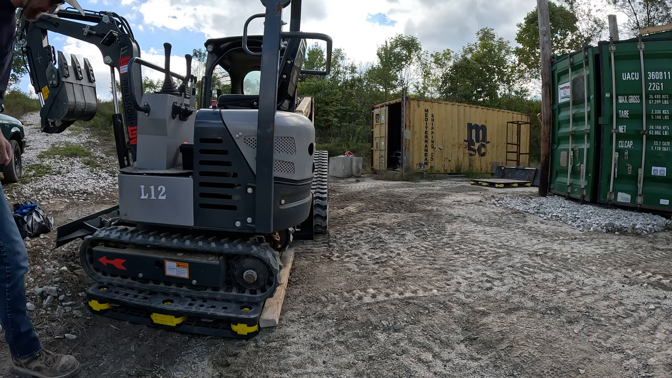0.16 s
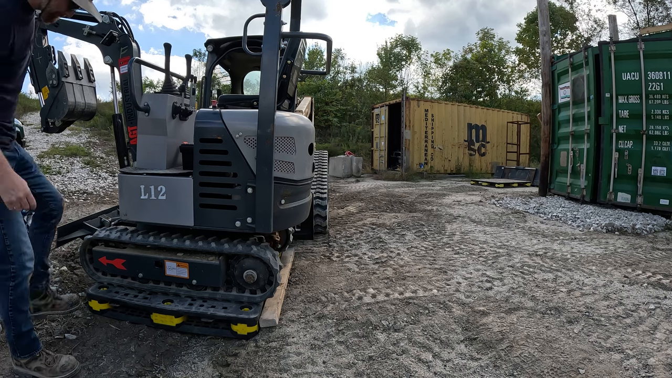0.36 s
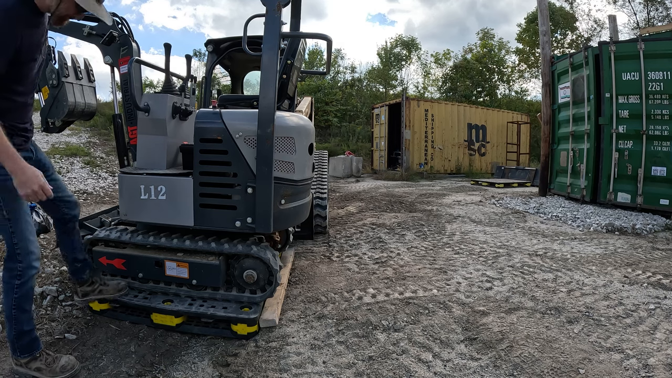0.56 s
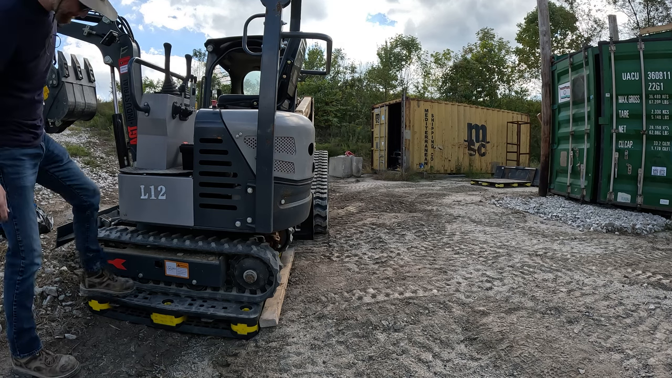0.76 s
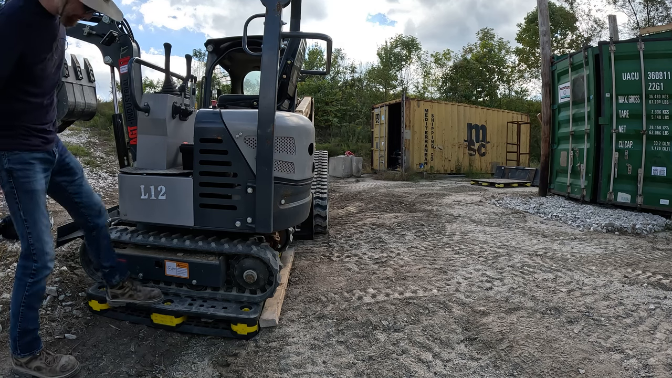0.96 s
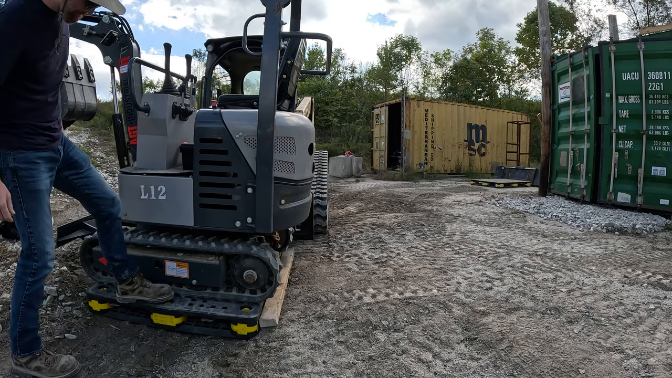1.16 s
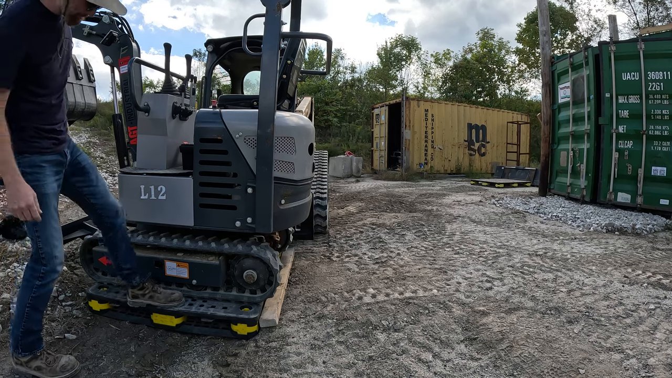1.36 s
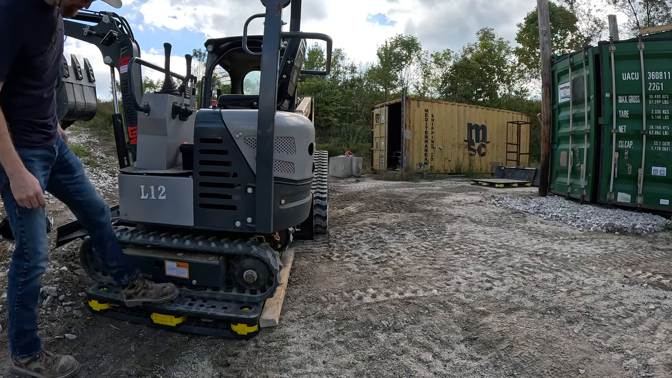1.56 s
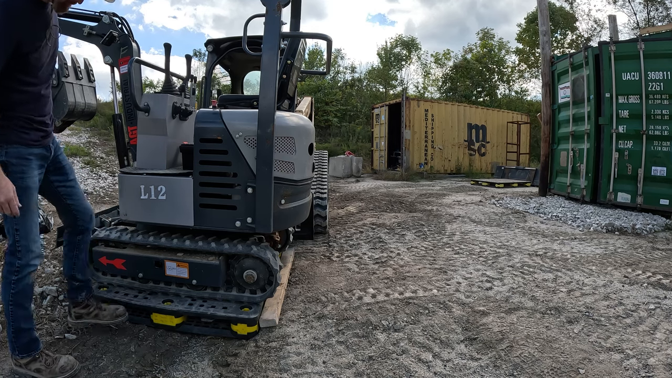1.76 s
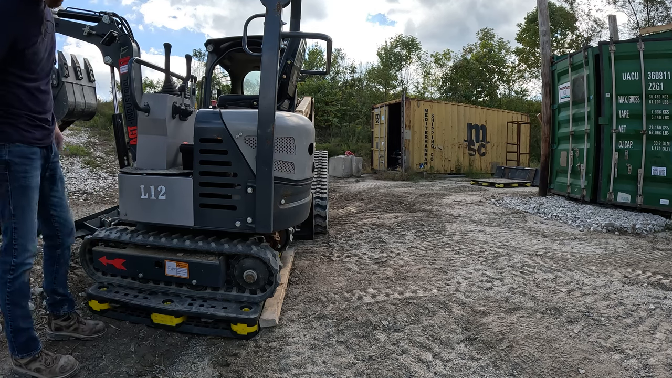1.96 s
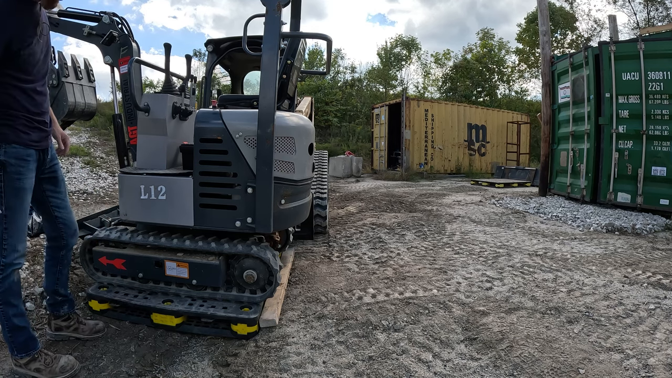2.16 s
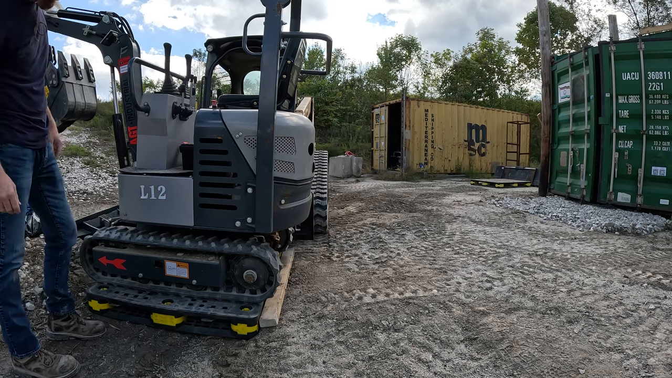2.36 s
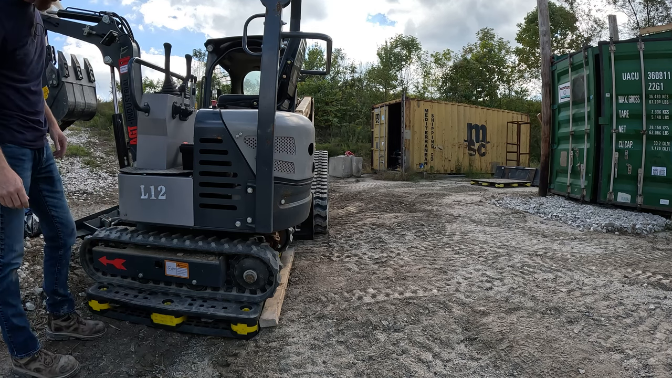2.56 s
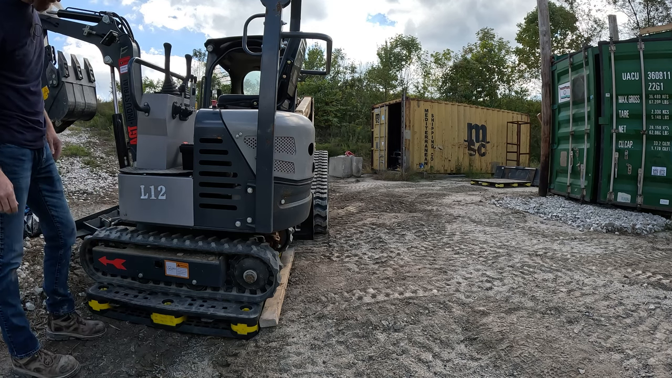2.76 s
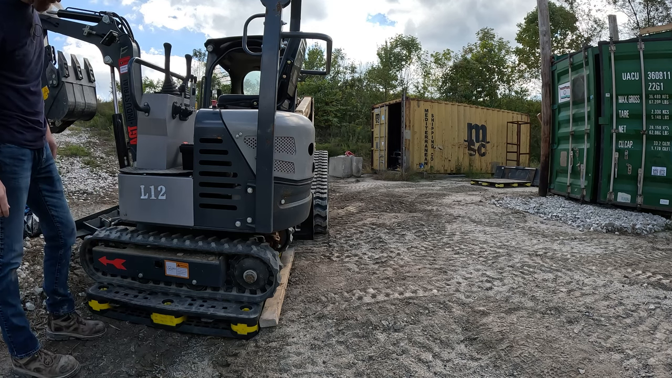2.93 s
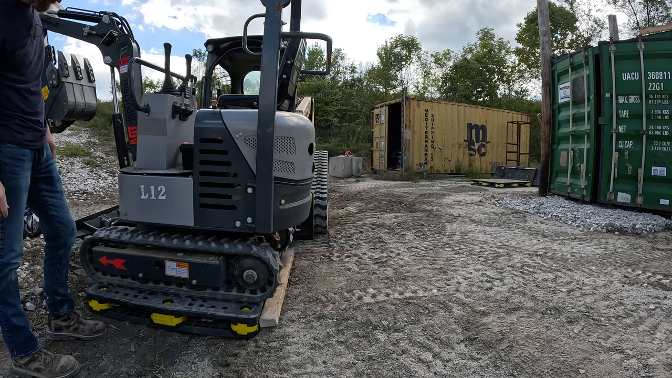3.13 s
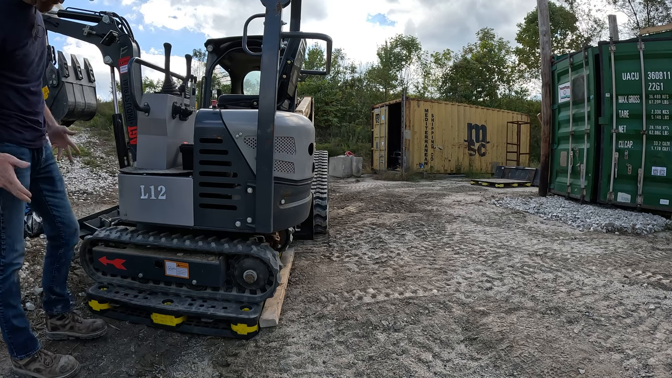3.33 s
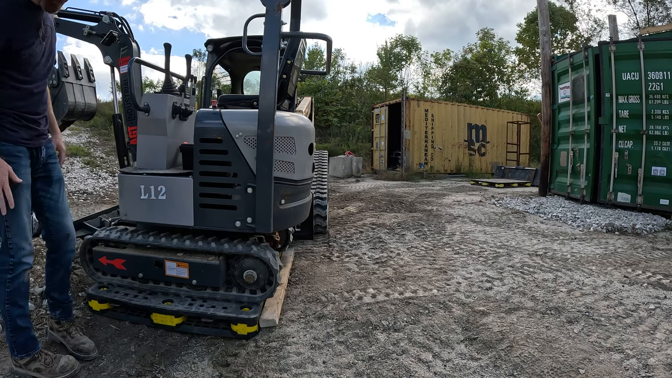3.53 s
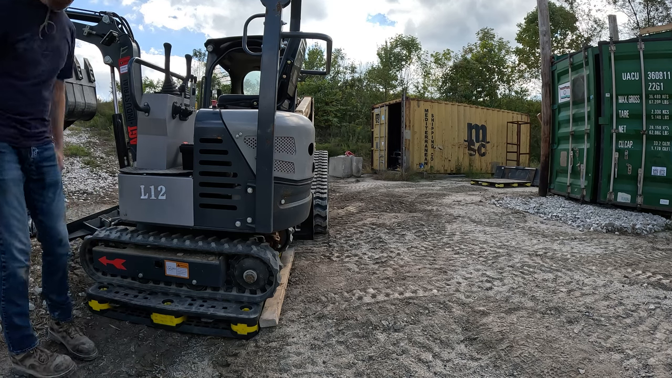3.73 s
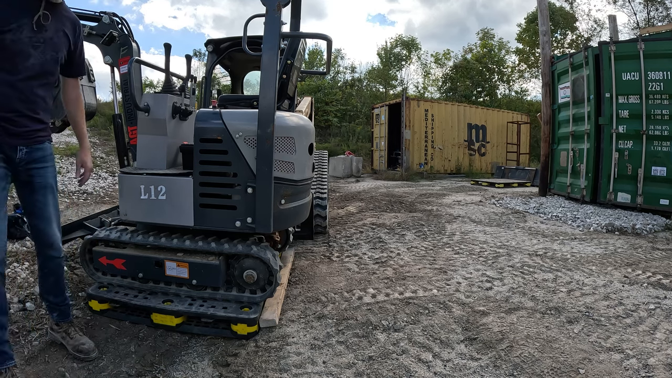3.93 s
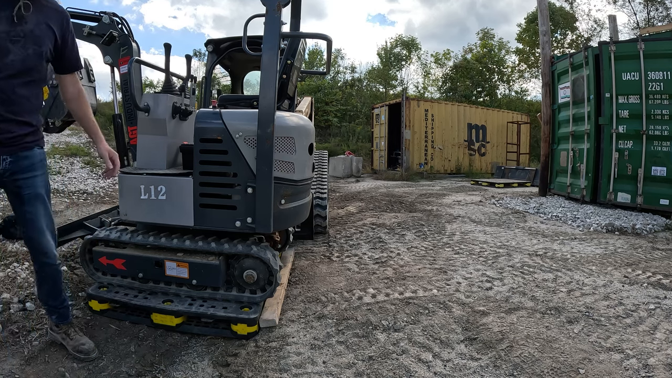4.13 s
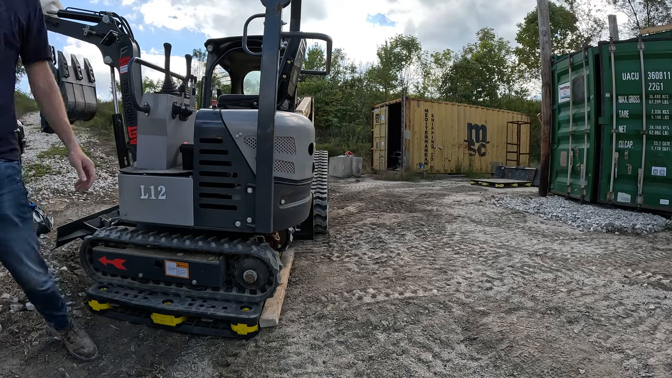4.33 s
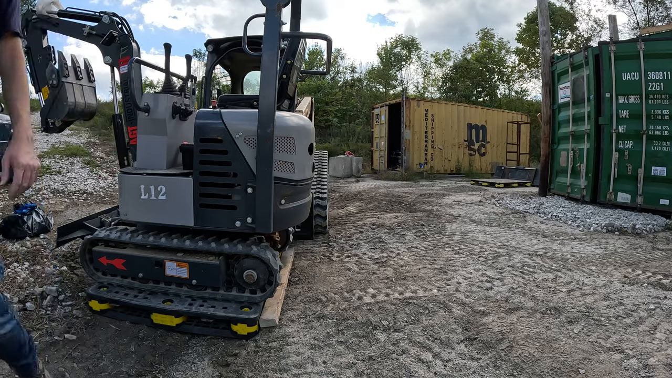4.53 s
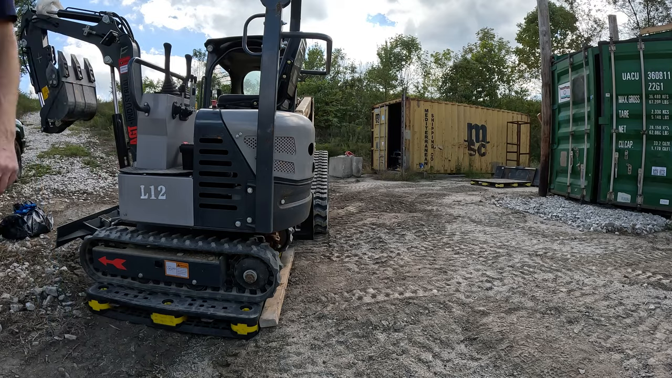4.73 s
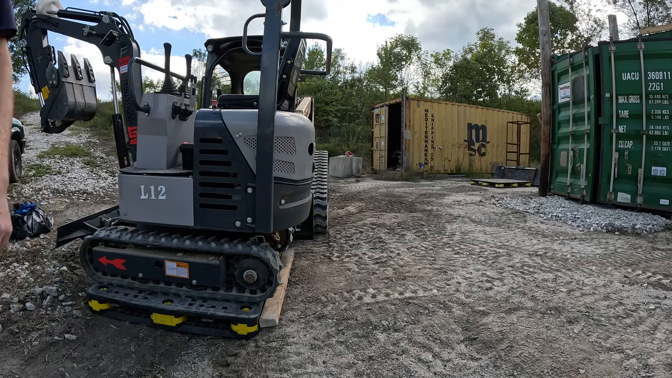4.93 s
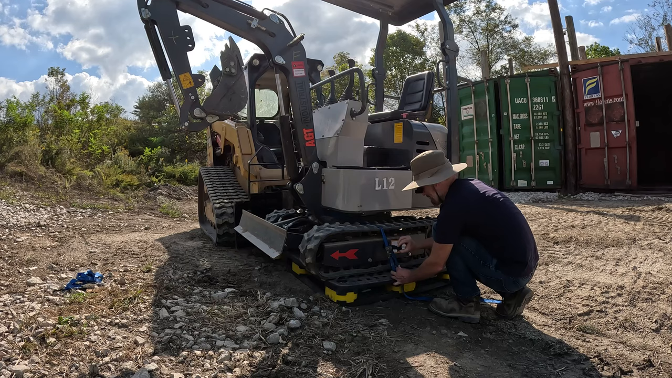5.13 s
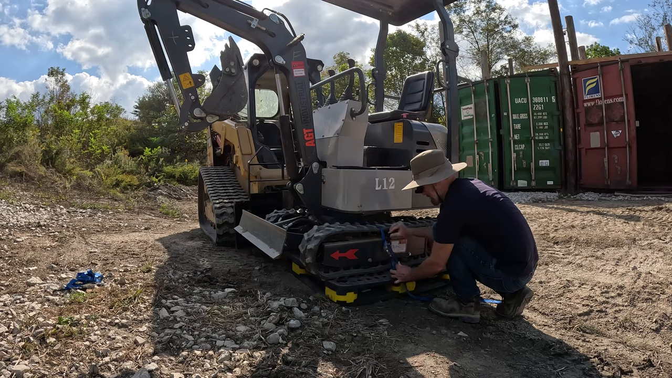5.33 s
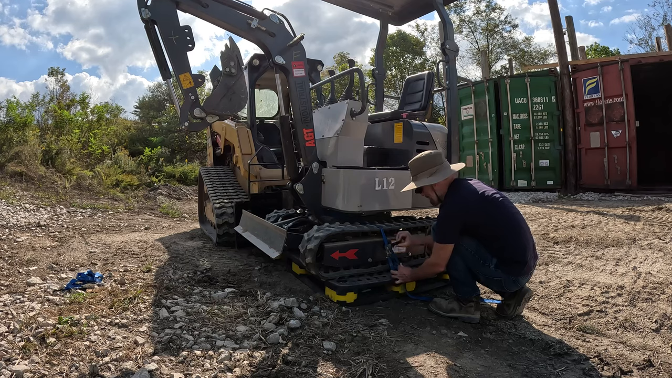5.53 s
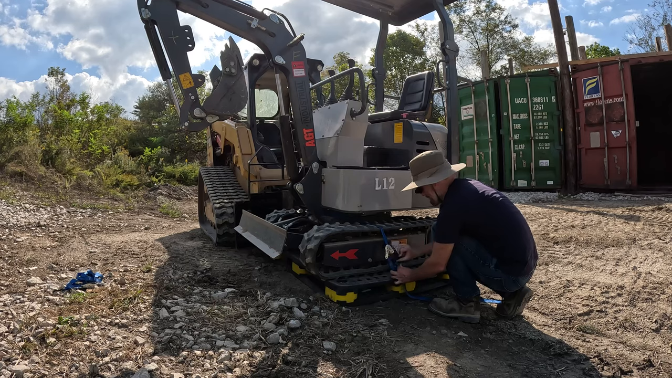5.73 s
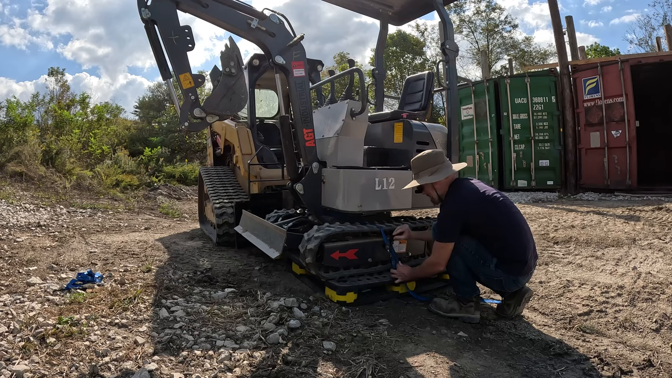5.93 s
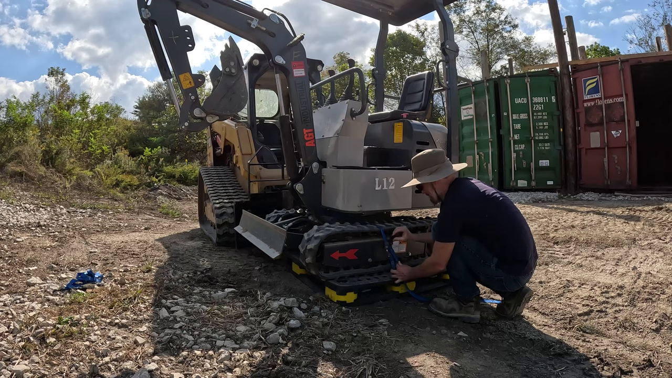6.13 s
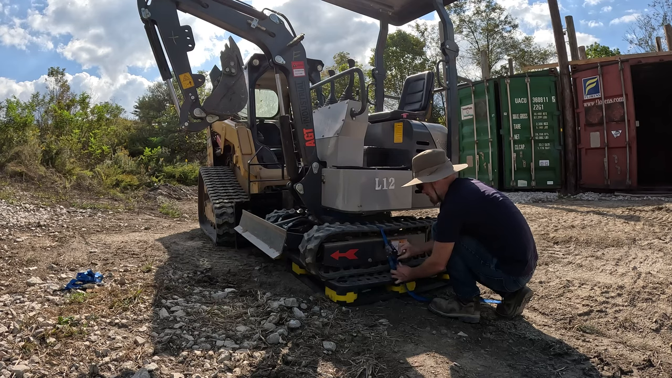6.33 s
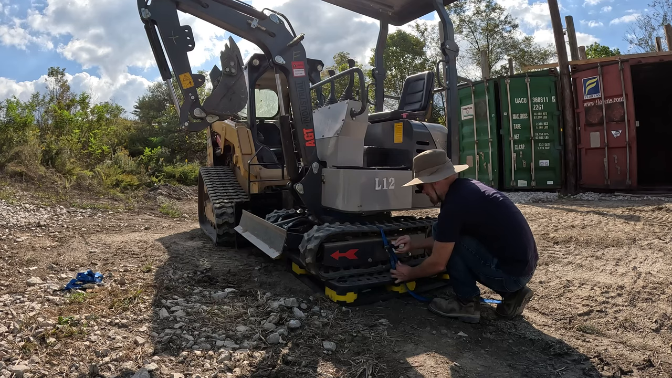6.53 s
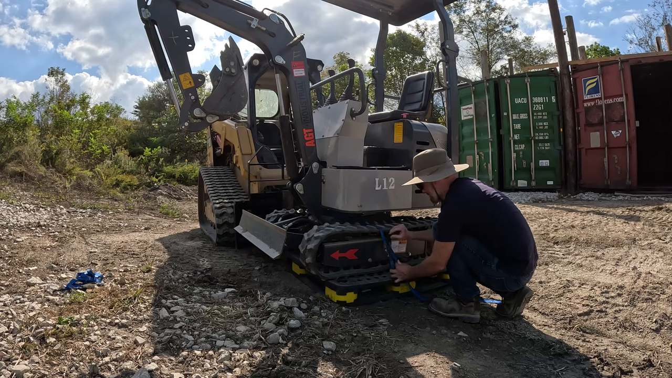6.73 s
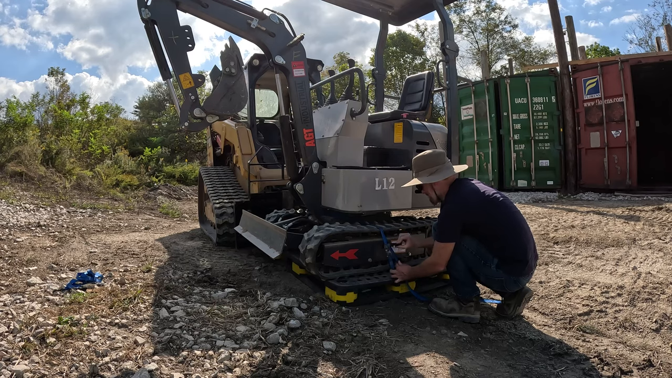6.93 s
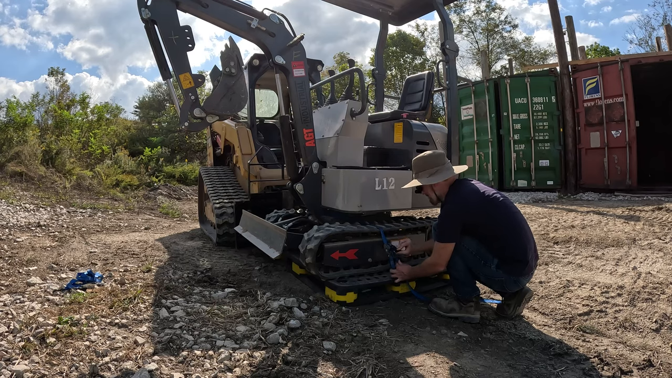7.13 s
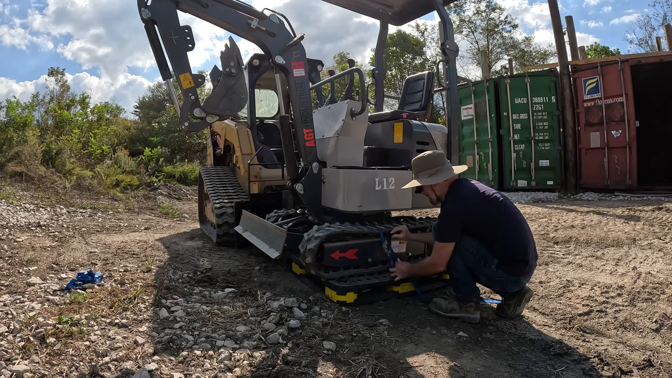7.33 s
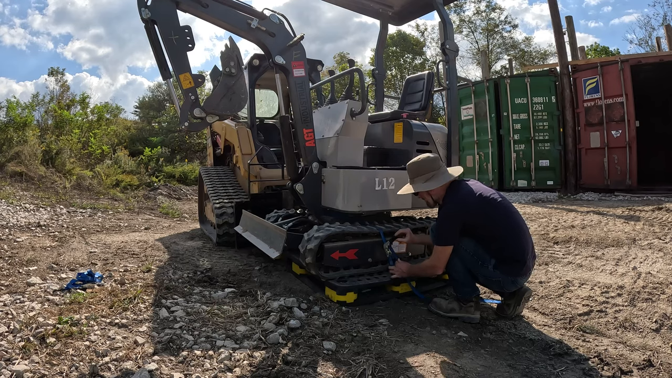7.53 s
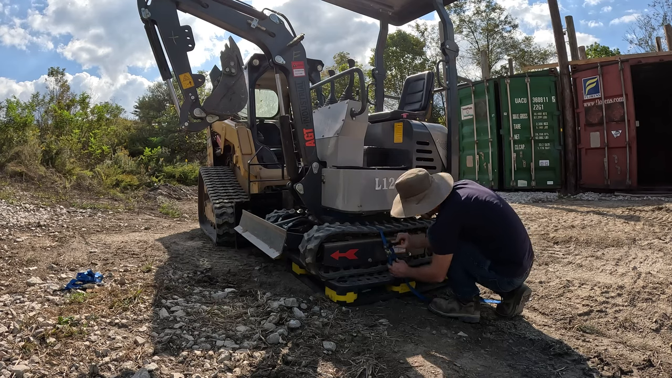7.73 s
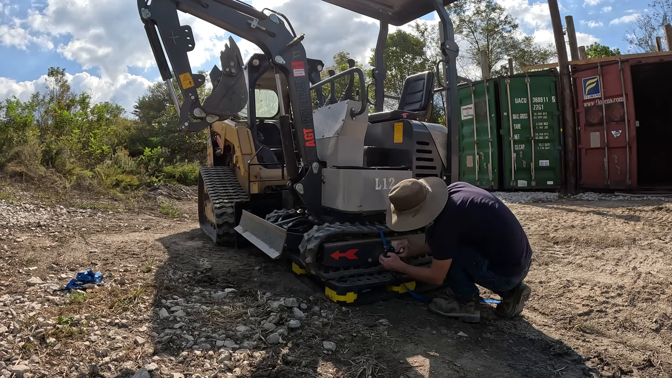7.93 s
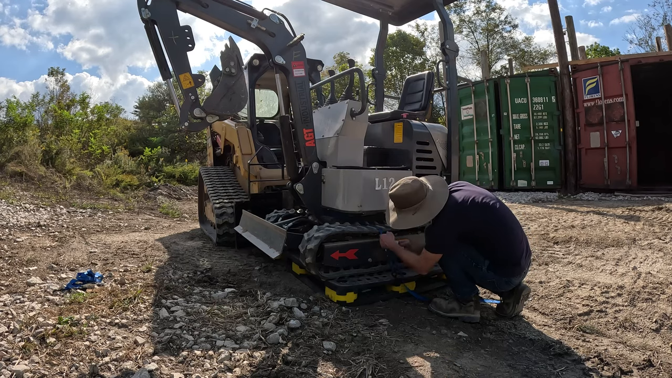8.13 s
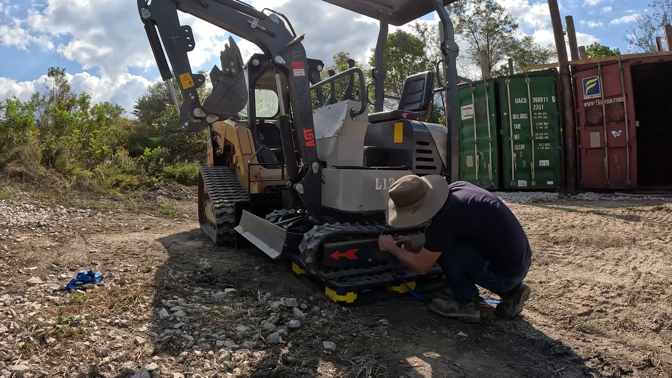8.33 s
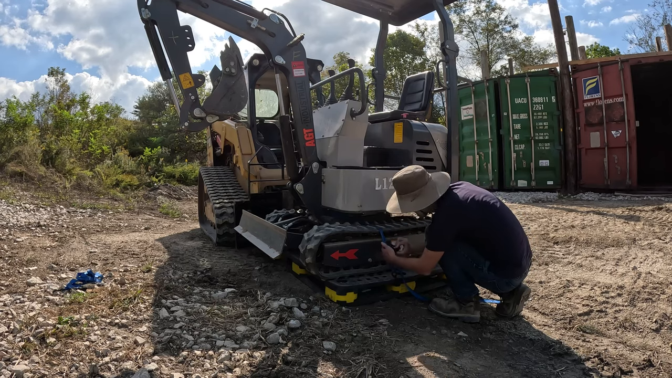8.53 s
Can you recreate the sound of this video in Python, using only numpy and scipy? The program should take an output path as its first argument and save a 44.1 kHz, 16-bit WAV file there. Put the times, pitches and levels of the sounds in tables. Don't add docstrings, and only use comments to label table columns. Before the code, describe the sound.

Steady insect chirring outdoors, quiet gravel steps and dull kicks on a small digger's track, followed by loud snapping ratchet clicks and metal knocks.

```python
import sys
import numpy as np
from scipy import signal
from scipy.fft import rfft, irfft, next_fast_len
from scipy.io import wavfile
from scipy.ndimage import uniform_filter1d, map_coordinates

SR = 44100
rng = np.random.default_rng(int(sys.argv[2]) if len(sys.argv) > 2 else 0)


def gain_from_db(level_db):
    decades = np.asarray(level_db, float) / 20
    return 10 ** decades


def to_wav(s):
    ch = np.atleast_2d(s).T
    pcm = np.round(np.clip(ch, -1, 1) * 32767)
    wavfile.write(sys.argv[1], SR, pcm.astype(np.int16))


N = 378378
MOVE_S = 5.19


def unit(x):
    return x / np.sqrt(np.mean(x ** 2) + 1e-20)


def peak_unit(x):
    return x / np.abs(x).max()


def along(points, hz):
    f, v = np.transpose(points)
    return np.interp(np.log(hz + 1), np.log(f + 1), v, left=v[0] - 40, right=v[-1] - 40)


def wobble(rate):
    return map_coordinates(rng.standard_normal(int(N * rate / SR) + 4), [np.arange(N) * rate / SR])


def filtered(x, response):
    m = next_fast_len(x.shape[-1] + 4096)
    return irfft(rfft(x, m) * response(np.fft.rfftfreq(m, 1 / SR)), m)[..., :x.shape[-1]]


def rush(spectrum, alike):
    turn = np.arccos(np.clip(alike, -1, 1)) / 2
    mid, side = filtered(rng.standard_normal((2, N)), lambda hz: gain_from_db(along(spectrum, hz)))
    mid, side = np.cos(turn) * mid, np.sin(turn) * side
    return unit(np.array([mid + side, mid - side]))


def ring(modes, t, attack, rough, scatter_db=2):
    beats = np.arange(64) / 70
    x = 0
    for hz, db, t60 in modes:
        drift = rng.standard_normal(64) + 1j * rng.standard_normal(64)
        flutter = np.interp(t, beats, 1 + rough * drift)
        level = gain_from_db(db + scatter_db * rng.normal() - 60 * t / t60)
        x = x + level * np.imag(flutter * np.exp(2j * np.pi * (hz * t + rng.random())))
    return peak_unit(x * (1 - np.exp(-t / attack)))


def burst(t, lo_hz, hi_hz, t60):
    x = filtered(rng.standard_normal(len(t)),
                 lambda f: 1 / np.sqrt((1 + (lo_hz / (f + 1)) ** 6) * (1 + (f / hi_hz) ** 6)))
    return peak_unit(x * gain_from_db(-60 * t / t60))


def swells(first_db, second_db, rows):
    t = np.arange(N) / SR
    bells = sum(gain_from_db(2 * db) * np.exp(-2 * ((t - s) / half) ** 2) for s, db, half in rows)
    return np.sqrt(gain_from_db(2 * np.where(t > MOVE_S, second_db, first_db)) + bells)


# freq_hz [Hz], t60_s [s]
YARD_DECAY = [(200, 0.3), (2000, .13), (5000, .06), (10000, 0.04)]


def add(track, s, x, pan_db, wet_db):
    hz, t, z = signal.stft(rng.standard_normal((2, SR // 6)), SR, nperseg=128)
    decay = gain_from_db(-60 * t / along(YARD_DECAY, np.clip(hz, 200, 10000))[:, None])
    tail = signal.istft(z * decay, SR, nperseg=128)[1]
    tail = 1.2 * tail[0] + .5 * tail
    wet = gain_from_db(wet_db) * signal.fftconvolve(x[None], tail / np.linalg.norm(tail[0]), axes=1)
    wet[:, :len(x)] += x
    track[:, round(s * SR):][:, :wet.shape[1]] += gain_from_db([[pan_db / 2], [-pan_db / 2]]) * wet


# start_s [s], peak_db [dB], frame_knock_db [dB], handle_db [dB], decay_index (each steel
# contact dies away in about 1.3 * decay_index ** 0.49 ms)
DROPS = [(5.251, -28.5, -11, -17, 2.9), (5.3287, -29, -6.5, -32, 4), (5.41, -15, -21, -28, 7.4),
         (5.7817, -11.5, -39, -47, 3.55), (5.9729, -24, -30, -30, 2.7), (6.028, -26, -29, -25, 4.8),
         (6.0947, -12.5, -47, -19.5, 3.2), (6.4397, -11, -43.5, -31.5, 0.97),
         (6.5014, -14.5, -35.5, -27, 2.15), (6.6187, -31.5, -22.5, -56, 2.2),
         (6.6668, -31.5, -22, -11, 5.5), (6.7264, -13.5, -18, -13, 4.7), (6.7765, -12.5, -22.5, -14.5, 2.3),
         (7.1008, -16, -34.5, -21, 4), (7.1896, -18, -35, -20.5, 3.5), (7.3663, -11.5, -19.5, -14, 3.25),
         (7.4536, -14, -35, -7.5, 5.8), (7.9185, -18, -30.5, -16.5, 4.4)]
# start_s [s], peak_db [dB], frame_knock_db [dB]
GRAZES = [(5.31, -45.5, -5), (5.617, -32.5, -33), (5.6885, -45.5, -18), (6.0766, -37, -13),
          (6.2827, -38.5, -42), (6.3136, -41, -30), (7.2443, -42.5, -24), (7.2929, -39.5, -17.5),
          (7.3220, -55, 6), (7.3420, -41.5, -2), (5.322, -58.5, 19.5), (5.400, -58, 21), (5.54, -61, -20),
          (5.568, -53, -16), (7.404, -43, -6), (7.5662, -39.5, -9.5), (7.604, -40, -8), (7.6311, -56, -14),
          (7.6866, -38.5, -21.5)]
# start_s [s], level_db [dB re
CONTACTS = [(5.2448, -12), (5.2482, -6), (5.2508, 1), (5.3286, -1), (5.3304, 0), (5.3316, -1), (5.4106, -2),
            (5.4117, -0.5), (5.416, -3), (5.7819, -4), (5.7819, 4), (5.7852, -5), (5.9715, -6), (5.9743, 3),
            (5.9764, -15), (6.0281, -8), (6.0296, -4), (6.0305, -3.5), (6.095, 2), (6.095, 0),
            (6.0994, -6.5), (6.4384, -15), (6.4394, 3), (6.442, -12), (6.445, -11), (6.5013, -4),
            (6.5023, -3), (6.5026, -7), (6.6148, -11), (6.616, -9), (6.62, 3), (6.6663, 1), (6.6689, -6),
            (6.6705, 4), (6.7258, -14), (6.728, -1), (6.7283, -9), (6.7283, 3), (6.7753, -6), (6.777, 2.5),
            (6.779, -6), (6.7816, -5), (7.1013, 3), (7.1027, -0.5), (7.1052, 5.5), (7.1894, -1.5),
            (7.192, 2), (7.192, -1), (7.3659, -11), (7.3671, -3.5), (7.3681, -7), (7.371, -18), (7.4536, 1),
            (7.4573, -3), (7.462, -13), (7.9181, 3), (7.9203, 1), (7.9236, -2.5),
            (5.7800, -13), (7.4518, -12), (7.0985, -8), (7.9159, -15), (6.7239, -13), (6.7723, -19),
         (5.4210, -9), (7.1935, -18)]
# start_s [s], body_db (under 3 kHz) [dB], middle_db [dB], treble_db [dB]
GRIPS = [(5.25, -0.5, -3, -5.5), (5.328, -2, 7.5, -2), (5.41, -1, -2.5, -2.5), (5.781, -2, -1.5, -6.5),
         (5.973, 2.5, -1, -4), (6.028, 4, 10, 2), (6.095, 0.5, -1.5, 1.5), (6.439, -2.2, 3.2, -2),
         (6.501, -1.5, -1, -3), (6.619, -4, 0, -11), (6.667, 4, 9, 1), (6.727, 0.1, 1.5, 0),
         (6.776, -2.5, 1, -3), (7.101, 1.2, 4, -2), (7.19, 0, -3, -9.5), (7.366, -1.5, 0, 2.2),
         (7.453, -4.5, -6.5, -5.5), (7.918, -0.3, 1.5, 2)]
# pitch_hz [Hz], width_hz [Hz], level_db [dB]
GEAR = [(2150, 210, -3.5), (3300, 150, 4), (4660, 135, 10), (4980, 720, 3), (5850, 23, 8), (6470, 98, -9),
        (6915, 43, 9), (7830, 160, 6), (8610, 70, 6), (8530, 17.3, 10.5), (9250, 560, 1), (11750, 490, 0)]
# freq_hz [Hz], density_db [dB per Hz]
SNAP = [(590, -57), (1000, -37.5), (2130, -8.5), (2390, -10.5), (4620, -1), (8550, -11.5), (9380, -6),
        (14800, -36), (16000, -60)]
# pitch_hz [Hz], level_db [dB], t60_s [s]
HANDLE = [(652, 10.5, 0.02), (851, 6.5, 0.045), (1068, 20, 0.018), (1240, 7, 0.018)]
# pitch_hz [Hz], level_db [dB], t60_s [s]
FRAME = [(281, -5.5, 0.27), (331, -4.5, 0.39), (393.6, 5.5, 0.13), (454.8, -4, 0.12), (508, 0.5, 0.095),
         (561.6, -13.5, 0.18)]
# pitch_hz [Hz], level_db [dB], t60_s [s]
BEAM = [(328, 0, .5), (443, -1, .55)]
# freq_hz [Hz], left_lag_rad [rad]
PORTS = [(0, 0.1), (3000, 0.73), (6000, 0.45), (10000, 0.43), (13000, 1.34)]


def ratchet():
    track, t = np.zeros((2, N + SR)), np.arange(SR // 3) / SR
    lead = .006
    u = t[:SR // 16] - lead
    grazes = [(s, db, knock_db, knock_db + 6.5, 4.3) for s, db, knock_db in GRAZES]
    for s, db, frame_db, handle_db, decay_index in DROPS + grazes:
        hits = [(at - s, less_db) for at, less_db in CONTACTS if abs(at - s) < .012] or [(0, 0)]
        decay_s = 0.0013 * decay_index ** 0.49
        power = sum(gain_from_db(2 * less_db) * (u > at) * np.exp(-2 * np.abs(u - at) / decay_s)
                    for at, less_db in hits)
        blows = np.sqrt(power) * rng.standard_normal((2, len(u))) * np.exp(.3 * rng.standard_normal(len(u)))
        gains = [gain_from_db(g + 4.45 * rng.normal()) for c, w, g in GEAR]

        def resonances(f):
            total = 0
            for k, (c, w, g) in enumerate(GEAR):
                damping = 1j * f * max(1.5 * w, 260)
                total = total + (-1) ** k * gains[k] * damping / (c * c - f * f + damping)
            return total

        low_db, mid_db, high_db = next((grip for at, *grip in GRIPS if abs(at - s) < .012), (0, 0, 0))
        dull_db = min(0.25 * (db + 11), 0)

        def tilt(f):
            grip_db = np.interp(f, [2500, 4250, 6400, 10900], [low_db, mid_db, 0, high_db])
            return gain_from_db((dull_db + 3.5) / (1 + (8000 / (f + 1)) ** 8) + grip_db)

        gear = filtered(blows[0], resonances)
        snap = filtered(blows[1], lambda f: gain_from_db(along(SNAP, f)))
        click = filtered(.9 * unit(gear) + unit(snap), tilt)
        held = [(hz, level, 0.73 * t60) for hz, level, t60 in FRAME]
        frame = ring(held, t, attack=0.0044, rough=0.72) + 1.4 * burst(t, 230, 610, t60=0.072)
        frame += gain_from_db(-11) * ring(BEAM, t, attack=0.0091, rough=0.71)
        handle = ring(HANDLE, t, attack=0.00079, rough=1.0) + 0.7 * burst(t, 390, 1600, t60=0.073)
        knock = (1 - np.exp(-t / 0.0052)) * (gain_from_db(frame_db + 1.5) * frame + gain_from_db(handle_db + 1.5) * handle)
        blow = np.pad(knock, (round(lead * SR), 0))
        blow[:len(click)] += peak_unit(click)
        add(track, s - lead, gain_from_db(db) * blow, pan_db=-1.8, wet_db=-16)
    hz, turn = np.transpose(PORTS)
    sides = np.array([[-1], [1]])
    return filtered(track, lambda f: np.exp(.5j * np.interp(f, hz, turn) * sides))[:, :N]


# start_s [s], peak_db [dB], thud_db [dB], slap_db [dB], grit_db [dB]
KICKS = [(0.678, -38.5, -8.5, -2, -32), (1.029, -34.5, -3, -1.5, -7), (1.057, -43, 4, 1, -0.5),
         (1.369, -37.5, -7, -0.5, -6), (1.385, -34.5, -3.5, 3, -14)]
# pitch_hz [Hz], level_db [dB], t60_s [s]
TRACK_MODES = [(72, -8, 0.78), (99.8, -1.5, 0.37), (126.7, -3, 0.62), (156, -5, 0.47), (218, 12, 0.056)]
# pitch_hz [Hz], level_db [dB], t60_s [s]
SLAP = [(553, -3, 0.114), (676, -13, 0.104), (785, -24, 0.091), (895, -4, 0.1), (990, -5, 0.08),
        (1214, 0, 0.045), (1500, -10, 0.04)]


def boot(track):
    t = np.arange(SR * 3 // 4) / SR
    for s, db, thud_db, slap_db, grit_db in KICKS:
        frame = ring(FRAME, t, attack=0.009, rough=0.88) + 1.74 * burst(t, 150, 540, t60=0.047)
        frame += 0.35 * burst(t, 250, 1080, t60=0.33)
        frame += gain_from_db(-9.5) * ring(BEAM, t, attack=0.014, rough=0.74)
        thud = ring(TRACK_MODES, t, attack=0.0024, rough=0.75) + .5 * burst(t, 40, 270, t60=0.51)
        slap = ring(SLAP, t, attack=0.00027, rough=0.86) + 1.96 * burst(t, 680, 1460, t60=0.043)
        grit = burst(t, 1360, 4100, t60=0.065)
        grit += gain_from_db(slap_db - grit_db - 6.5) * burst(t, 1500, 5300, t60=0.015)
        kick = frame + gain_from_db(thud_db + 3.5) * thud + gain_from_db(slap_db + 2) * slap + gain_from_db(grit_db + 5) * grit
        add(track, s, gain_from_db(db) * (1 - np.exp(-t / 0.00046)) * kick, pan_db=0.5, wet_db=-15)


# start_s [s], peak_db [dB], heel_db [dB], grit_db [dB], t60_s [s]
STEPS = [(0.153, -50.5, -4, -8.5, 0.29), (1.954, -39.5, -9, 0, 0.12), (1.966, -40, -12, -11, 0.19),
         (3.614, -60.5, 4.5, -1, 0.09), (3.746, -60.5, -9, -7, 0.085), (4.304, -64, -11, -0.5, 1),
         (4.377, -56, -26, -7, 0.24), (4.976, -48, -31, -16, 0.19), (4.99, -52.5, -21.5, -8, 0.55),
         (5.025, -48.5, -12.5, -18, 0.11), (6.091, -48, -12.5, -17, 0.33), (7.364, -47.5, -15, -11, 0.68)]


def steps(track):
    t = np.arange(SR // 2) / SR
    soft = 1 - np.exp(-t / 0.00087)
    for s, db, heel_db, grit_db, t60 in STEPS:
        sole = burst(t, 188, 198, t60) + gain_from_db(heel_db + 9) * burst(t, 32, 124, 0.88 * t60)
        crunch = burst(t, 1030, 1970, 0.85 * t60) + 0.99 * burst(t, 3700, 4600, 0.63 * t60)
        add(track, s, gain_from_db(db - 0.5) * (soft * sole + gain_from_db(grit_db) * crunch), pan_db=1.5, wet_db=-16.5)


# start_s [s], peak_db [dB], pitch_hz [Hz], left_right_db [dB]
STONES = [(0.053, -39.5, 1330, 4.5), (0.764, -42.5, 1530, 4), (0.781, -42.5, 3000, 7),
          (1.169, -39, 1500, 4), (1.274, -44, 3160, 5), (1.735, -50, 1300, 0.0), (1.793, -55, 1280, -0.5),
          (3.7402, -39.5, 1310, 3), (3.7443, -35, 1720, 5.5), (3.746, -42, 3600, 11), (4.049, -51, 1290, 8),
          (4.48, -40.5, 3300, 10), (4.5, -47.5, 2410, 6), (4.959, -55.5, 1270, 10), (5.2104, -35, 915, -3),
          (5.219, -40, 1030, -3), (8.273, -49, 1700, -4), (1.9538, -50, 2640, 4)]


def stones(track):
    t = np.arange(SR // 20) / SR
    for s, db, hz, pan_db in STONES:
        click = ring([(hz, 0, .03), (1.41 * hz, -6, .02)], t, attack=0.00009, rough=0)
        click += 1.4 * burst(t, 0.78 * hz, 1.2 * hz, t60=0.015)
        top_hz = min(6700, 0.9 * hz) if s > MOVE_S else 6700
        click += 0.7 * burst(t, 200, top_hz, t60=0.018)
        add(track, s, gain_from_db(db - 11) * click, pan_db, wet_db=-18)


# start_s [s], peak_db [dB], upper_modes_db [dB]
CLANKS = [(0.1895, -59.5, 11.5), (0.534, -64, -8), (1.6405, -64.5, -3), (2.374, -68, -15),
          (2.5539, -67.5, 16), (2.9693, -64.5, 0), (4.0688, -57, 1), (4.5243, -61.5, -2)]
# pitch_hz [Hz], level_db [dB], t60_s [s]
CLANK_LOW = [(980, 5, 0.8), (1240, 16.5, 1), (1510, 9.5, 1), (1500, 19, 0.48), (1780, -8, .3)]
# pitch_hz [Hz], level_db [dB], t60_s [s]
CLANK_HIGH = [(2100, 9, 0.39), (2370, -1, 0.34), (3290, -5, 0.22)]


def clanks(track):
    t = np.arange(SR * 3 // 4) / SR
    for s, db, high_db in CLANKS:
        steel = ring(CLANK_LOW, t, attack=.002, rough=1.1, scatter_db=1)
        steel += gain_from_db(high_db - 5) * ring(CLANK_HIGH, t, attack=.002, rough=.4, scatter_db=1)
        wash = 3.3 * burst(t, 1140, 7400, t60=0.33) + 0.51 * burst(t, 1500, 1700, t60=1.0)
        add(track, s, gain_from_db(db - 4) * (0.85 * steel + wash), pan_db=2.5, wet_db=-4.5)


# start_s [s], rms_db [dB], length_s [s], top_hz [Hz]
SCUFFS = [(1.313, -73.5, 0.037, 2620), (2.02, -77, 0.073, 3220), (3.753, -74.5, 0.13, 6700),
          (4.992, -65.5, 0.086, 1500), (5.009, -68.5, 0.027, 6200)]
# middle_s [s], level_db [dB], half_length_s [s]
RUSTLES = [(0.167, -80, 0.19), (0.745, -85, .15), (1.25, -83.5, 0.47), (2.587, -80, 0.084), (4.298, -85, 1),
           (5.304, -76, 0.27), (6.7, -70, 0.086), (7.367, -75.5, 0.37)]
# freq_hz [Hz], density_db [dB per Hz]
GRAVEL = [(400, -100), (1000, 6), (2000, -1), (2800, -2.5), (5000, 2), (9000, -4.5), (12600, -5),
          (13100, -33)]
# freq_hz [Hz], density_db [dB per Hz]
FIELD = [(8200, -19), (9500, -7), (10500, -20), (12500, -13), (14500, -25), (15500, -37)]


def scuffing(track):
    for s, db, length, top_hz in SCUFFS:
        t = np.arange(round(length * SR)) / SR
        drag = np.sin(np.pi * t / length) * unit(burst(t, 780, top_hz, t60=9))
        add(track, s, gain_from_db(db + 6) * drag, pan_db=7, wet_db=-14.5)
    grains = np.exp(.25 * wobble(150))
    haze = gain_from_db(-75) * (np.arange(N) > MOVE_S * SR) * rush(FIELD, alike=0.27)
    return swells(-89.5, -80, RUSTLES) * gain_from_db(10) * unit(grains * rush(GRAVEL, alike=0.37)) + haze


def chirps(rate, top_hz, fall_hz, duty, rough):
    phase = np.cumsum(rate * (1 + .01 * wobble(3.4))) / SR + rng.random()
    cycle = np.clip(phase % 1 / duty, 0, 1)
    shape = np.sin(np.pi * cycle ** 2) ** .5
    hz = top_hz - fall_hz * cycle ** 3
    return unit(np.abs(shape) * np.exp(rough * wobble(300)) * np.sin(2 * np.pi * np.cumsum(hz) / SR))


# time_s [s], chorus_db [dB]
CRICKET_LEVEL = [(0, -58), (1.4, -63), (2.5, -60), (4.9, -58.5), (5.45, -55), (7.6, -57.5), (8.58, -54.5)]
# freq_hz [Hz], density_db [dB per Hz]
CHORUS = [(3410, -58), (5800, -26), (6070, -14.5), (6600, 0.5), (6780, 1.5), (7590, 1), (8070, -5),
          (8350, -15), (8740, -17), (9000, -21), (11700, -36), (19800, -120)]


def crickets():
    ground_db = np.interp(np.arange(N) / SR, *np.transpose(CRICKET_LEVEL))
    moved = np.arange(N) > MOVE_S * SR
    near = chirps(27.8 + .9 * moved, 7930 - 80 * moved, fall_hz=560, duty=.8, rough=.15)
    second = chirps(35.5, 7100, fall_hz=411, duty=.7, rough=0.52)
    ground = rush(CHORUS, alike=.7) * gain_from_db([[1.2], [-1.2]])
    ground = ground + near * gain_from_db([[1.5], [-3]] - 1.5 * moved) + second * gain_from_db(-9)
    tree = 0
    for rate, hz, db, pan_db in [(60.1, 3620, -13, 9.4), (46.95, 3540, -4, 0.75), (56.2, 3690, -18.5, 16)]:
        singer = chirps(rate, hz + 170 * moved, fall_hz=77.2, duty=0.75, rough=0.42)
        tree = tree + singer * gain_from_db([[db + pan_db], [db - pan_db]])
    blur = []
    for hz, wide in [(3590, 198), (3760, 170)]:
        hump = [(hz - 3 * wide, -26), (hz - wide, -5), (hz, 0), (hz + 1.8 * wide, -7), (hz + 3.6 * wide, -22)]
        blur.append(rush(hump, alike=0.57))
    tree = unit(tree) + gain_from_db(-2) * np.where(moved, blur[1], blur[0])
    ground = gain_from_db(ground_db + 0.93 * wobble(2.374)) * unit(ground)
    return ground + swells(-69.5, -63.5, []) * gain_from_db(wobble(4.9)) * unit(tree)


# start_s [s], end_s [s], full_db [dB], stroke_rate [strokes per s]
SONGS = [(0.1, 3.57, -72, 71), (5.85, 7.88, -62.5, 101)]
# freq_hz [Hz], density_db [dB per Hz]
WINGS = [
    [(5000, -39), (8500, -5.5), (9450, 1), (10100, 0.5), (10300, -9.5), (11500, -1), (12100, -4), (13100, -13), (14700, -19), (15300, -49), (15500, -39)],
    [(5000, -48), (8500, -15), (9760, -2.5), (10700, -9), (11300, -2), (11900, 0.5), (12700, -9), (13500, -15), (14900, -23), (15500, -39)],
]
# start_s [s], peak_db [dB]
TICKS = [(3.699, -47), (3.806, -45.5), (4.0741, -57), (4.3061, -54), (4.3984, -50), (4.593, -49),
         (7.9672, -44), (8.0625, -42), (8.292, -43.5), (8.529, -46.5)]


def katydids(track):
    t, buzz = np.arange(N) / SR, 0
    for (start, end, full_db, pace), wing, pan_db, fade_db in zip(SONGS, WINGS, (3, 2), (0.1, 3.5)):
        db = full_db - 14 * np.exp(-np.abs(t - start) / 0.78) - fade_db * np.exp(-np.abs(end - t) / 0.25)
        rate = pace * (1 - 0.077 * np.exp(-np.abs(end - t) / .15))
        singing = np.clip(np.minimum((t - start) / .1, (end - t) / 0.023), 0, 1)
        stroke = 0.14 + uniform_filter1d(gain_from_db(-14 * (np.cumsum(rate) / SR % 1)), size=30)
        song = unit(stroke * rush(wing, alike=0.24))
        buzz = buzz + singing * gain_from_db(db + 6.5) * song * gain_from_db([[pan_db], [-pan_db]])
    t = t[:1000]
    for s, db in TICKS:
        wing_hz = 11900 if s > MOVE_S else 10300
        for late in (0, .007):
            rasp = burst(t, 6000, 14000, t60=0.032)
            tick = unit(filtered(rasp, lambda f: 1 / (1 + ((f - wing_hz) / 1100) ** 2)))
            add(track, s + late, gain_from_db(db - 34) * (1 - np.exp(-t / 0.0007)) * tick, pan_db=28, wet_db=-12)
    return buzz


# middle_s [s], level_db [dB], half_length_s [s]
GUSTS = [(1.15, -76, 0.13), (1.553, -75, .12), (3.15, -94, 0.17), (4.55, -89, .1), (5.44, -66.5, 0.21),
         (5.816, -63.5, 0.066), (6.154, -69.5, 0.25), (6.644, -73, 0.52), (7.354, -70, 0.15),
         (7.802, -65.5, 0.039), (8.5, -77, 0.11)]
# freq_hz [Hz], density_db [dB per Hz]
WIND = [(20, -2), (35, -3), (60, 1.5), (90, -9), (130, -8), (250, -13)]
# freq_hz [Hz], density_db [dB per Hz]
HUM = [(79, -81), (135, 1.5), (194, 1), (269, -5), (469, -7), (830, -16), (1010, -12.5), (2140, -23),
       (2570, -42), (3000, -20.5), (3900, -70), (6600, -120)]


def air():
    wind = swells(-93.5, -79.5, GUSTS) * gain_from_db(5.5 + 5.1 * wobble(13)) * rush(WIND, alike=0.91)
    hum = swells(-80.5, -74.5, []) * gain_from_db(5.5 + wobble(3.6)) * rush(HUM, alike=0.18)
    return wind + hum * gain_from_db([[-2.5], [2.5]])


def scene():
    track = np.zeros((2, N + 2 * SR))
    steady = crickets() + katydids(track) + scuffing(track) + air()
    for source in (boot, steps, stones, clanks):
        source(track)
    return track[:, :N] + steady + ratchet()


def band_limit(x):
    return signal.sosfilt(signal.butter(12, 16460, fs=SR, output="sos"), x)


def record(dry):
    heard = filtered(dry, lambda hz: 1 / np.sqrt(1 + (hz / 14500) ** 16) / (1 + (hz / 15900) ** 60))
    return band_limit(heard)


dry = scene()
out = record(dry)
to_wav(out)
```